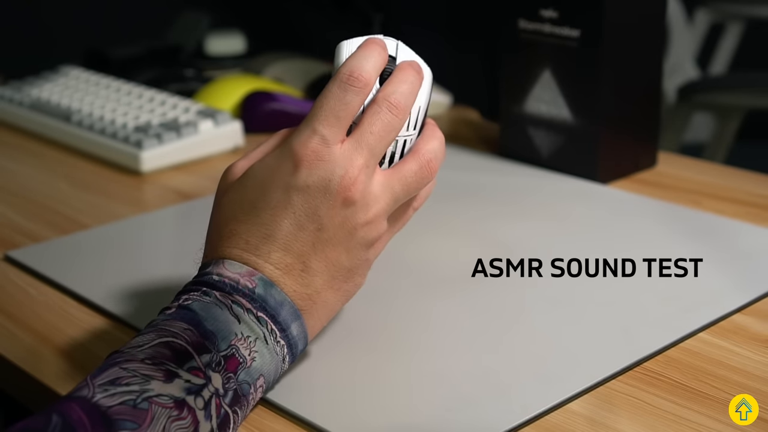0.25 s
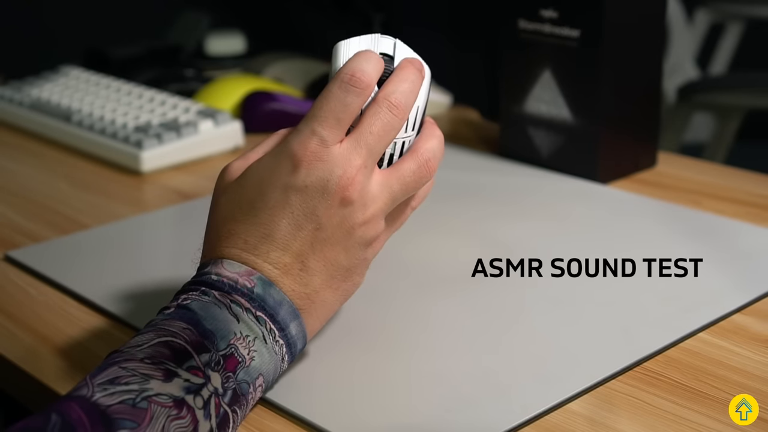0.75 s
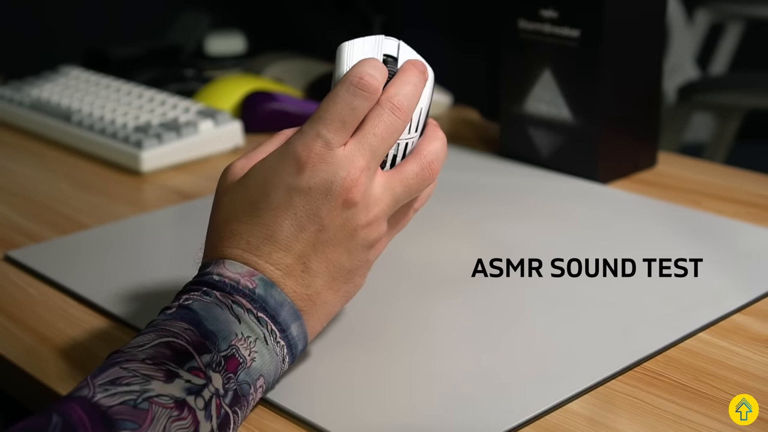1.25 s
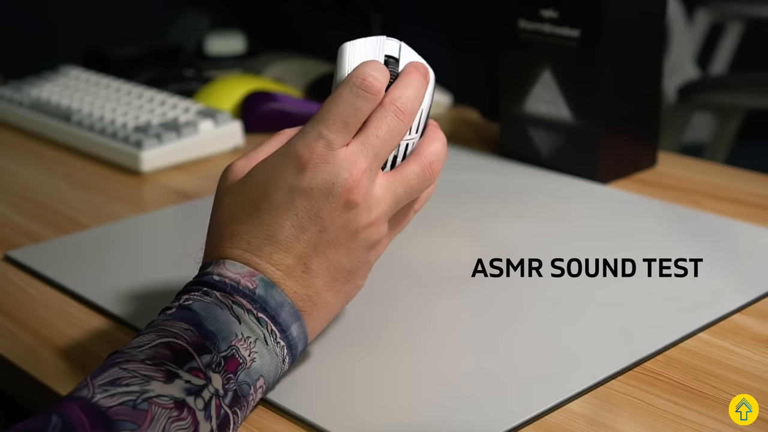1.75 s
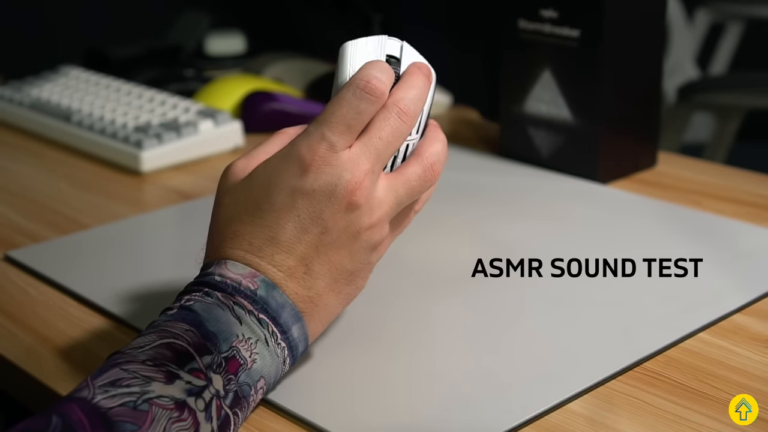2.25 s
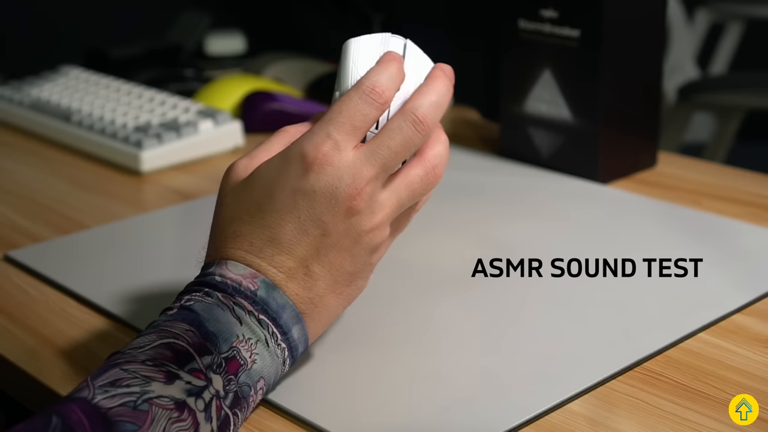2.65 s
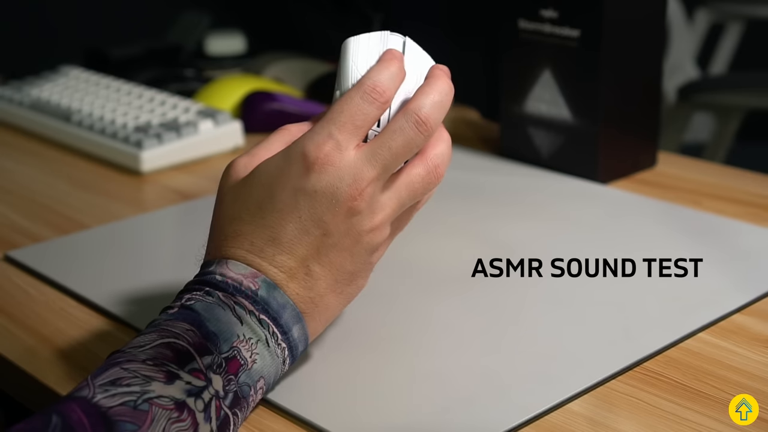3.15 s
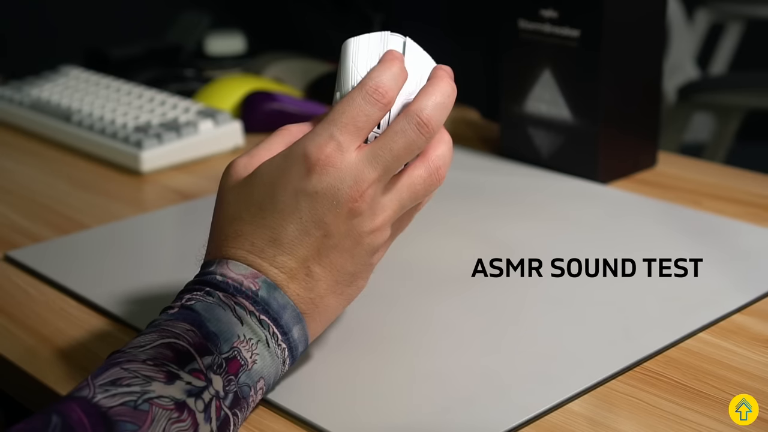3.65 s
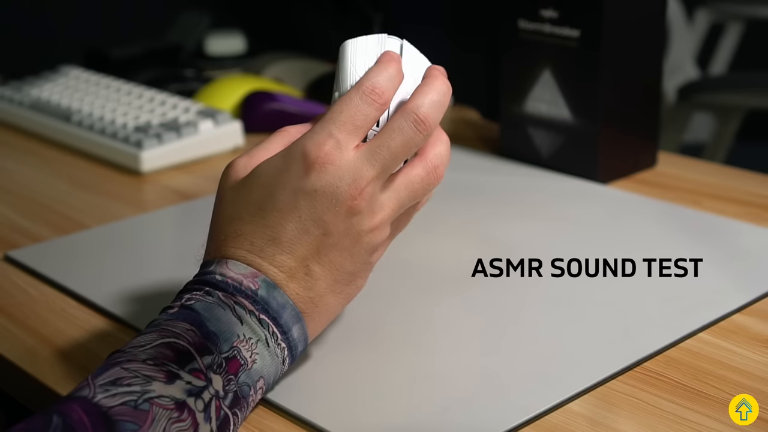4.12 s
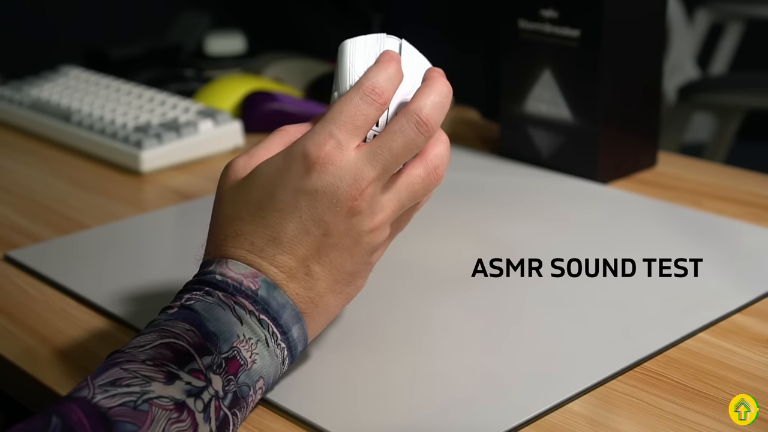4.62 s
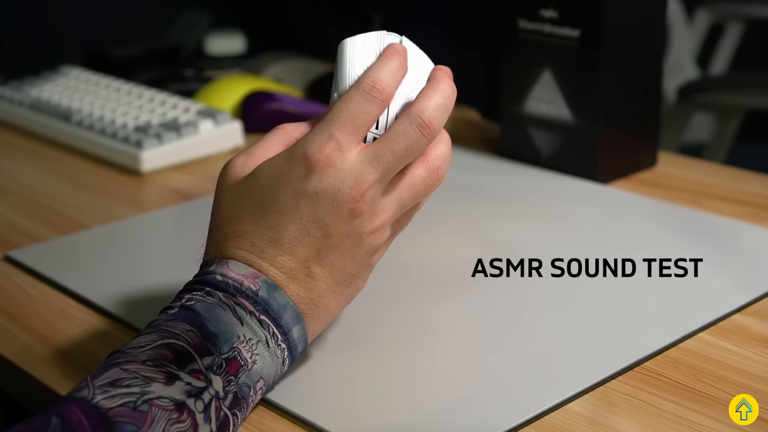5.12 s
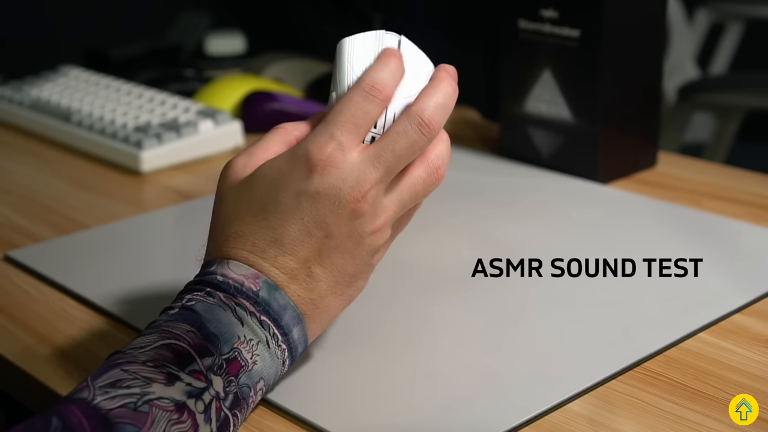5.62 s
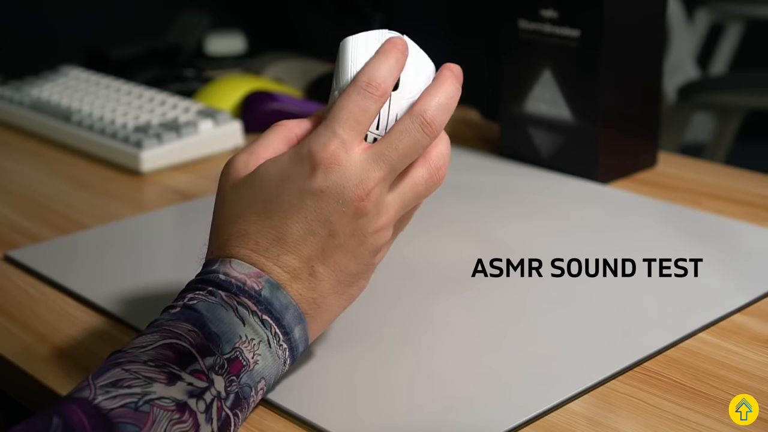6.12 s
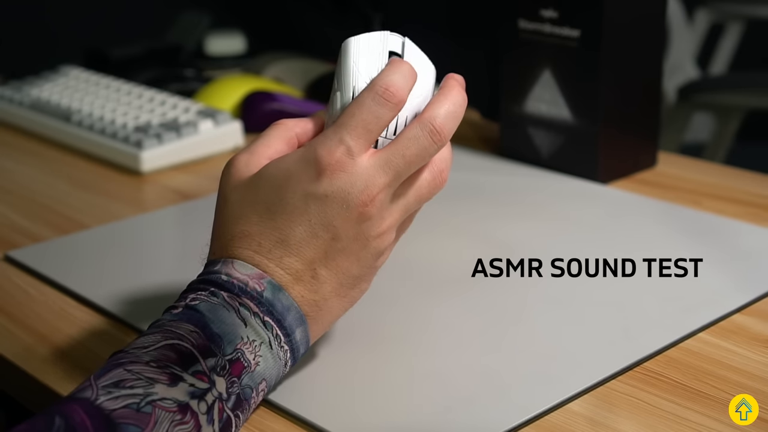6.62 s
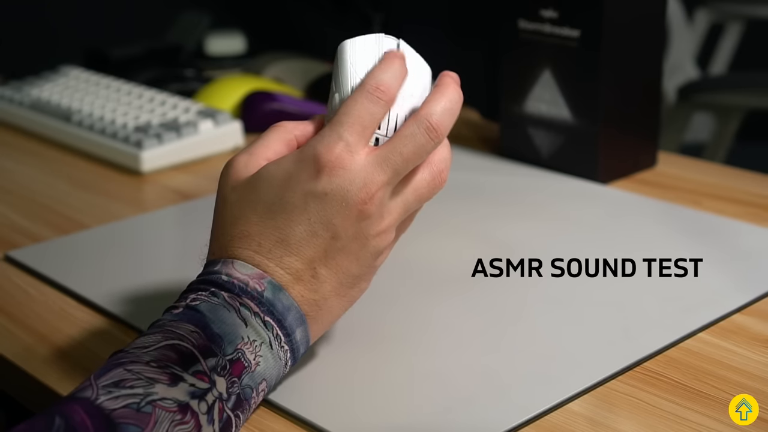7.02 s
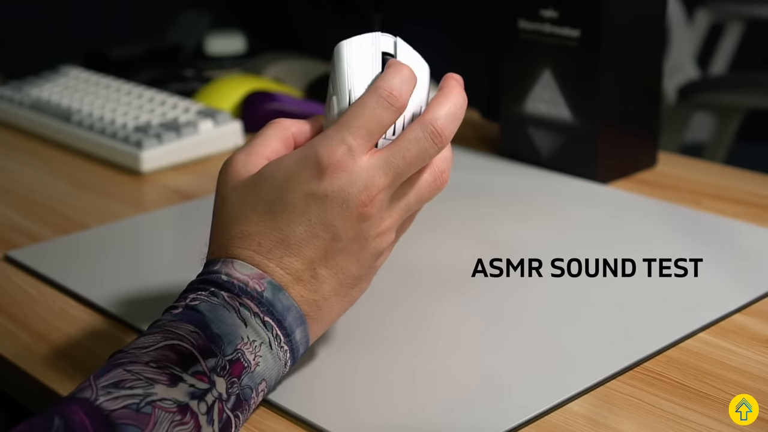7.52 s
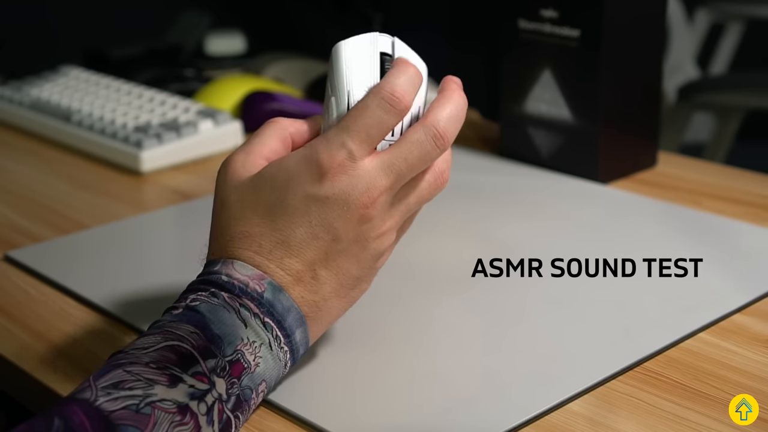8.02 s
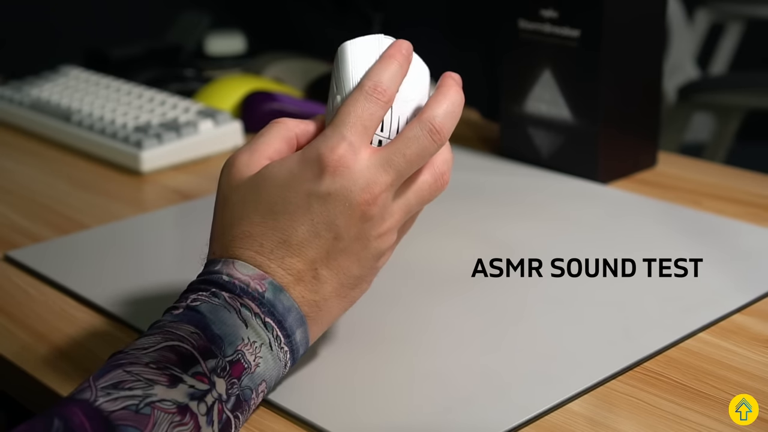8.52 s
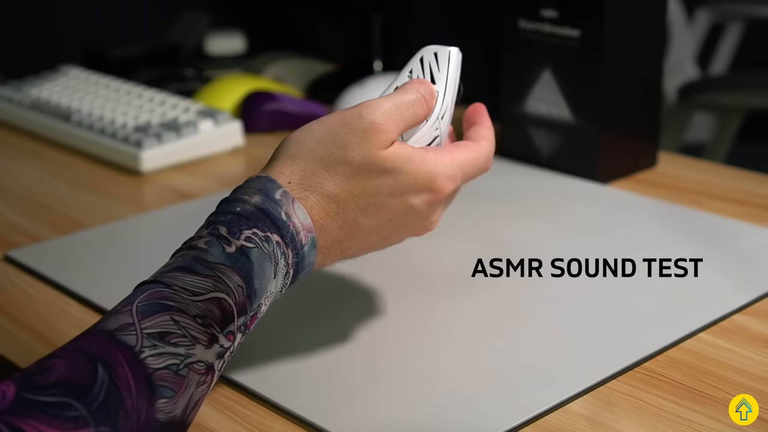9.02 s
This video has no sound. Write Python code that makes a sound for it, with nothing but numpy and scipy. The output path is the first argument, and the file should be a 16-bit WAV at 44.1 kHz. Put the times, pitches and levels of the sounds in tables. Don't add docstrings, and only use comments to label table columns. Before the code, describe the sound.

A plastic computer mouse very close to the microphone in a quiet small room. Two bright left clicks, then nine quick right clicks, each a press and lighter release. Seven much softer, duller side-button clicks follow. The scroll wheel is rolled in short strokes of four or five tiny ticks, first faint, then brighter the other way. Two sharp, loud small-switch clicks end it. Faint fan noise and low rumble lie underneath.

```python
import sys
import numpy as np
from scipy import signal
from scipy.fft import rfft, irfft
from scipy.io import wavfile
from scipy.ndimage import uniform_filter1d, map_coordinates

SR = 44100
rng = np.random.default_rng(int(sys.argv[2]) if len(sys.argv) > 2 else 0)


def invert_db(level):
    return 10 ** (np.asarray(level, dtype=float) / 20)


def bounce(signal):
    frames = np.transpose(np.atleast_2d(signal))
    limited = np.clip(frames, -1, 1)
    pcm = np.round(limited * 32767).astype(np.int16)
    wavfile.write(sys.argv[1], SR, pcm)


N = 408366

# (time [s], peak level [dB])
LEFT_PRESSES = [
    (0.0333, -20),
    (0.2904, -18.5),
]
LEFT_RELEASES = [
    (0.179, -26.5),
    (0.4263, -25),
]
# (time [s], peak level [dB])
RIGHT_PRESSES = [(0.5572, -17.5), (0.846, -19), (1.0665, -17), (1.3277, -18), (1.571, -18.5),
                 (1.7753, -19.5), (1.9852, -19), (2.2047, -19), (2.378, -19)]
RIGHT_RELEASES = [(0.7226, -26), (0.9557, -23.5), (1.195, -22.5), (1.4186, -24.5), (1.6397, -22.5),
                  (1.8681, -24.5), (2.0824, -23.5), (2.2705, -22)]
# (time [s], peak level [dB])
SIDE_PRESSES = [(2.6887, -31.5), (2.965, -32.5), (3.2183, -34), (3.4656, -33), (4.0325, -33),
                (4.2832, -32.5), (4.803, -33.5)]
SIDE_RELEASES = [(2.8372, -34.5), (3.1138, -34), (3.3564, -35.5), (3.773, -34.5), (4.1937, -35),
                 (4.666, -34.5), (4.9593, -34.5)]
# (time [s], peak level [dB])
TICK_TIMES = [(0.5347, -53), (2.5745, -59), (2.835, -53), (3.3448, -45), (3.5823, -52.5), (4.6632, -50),
              (4.7945, -62), (4.7564, -49.5), (6.6834, -65.5), (6.8244, -63)]
# (time [s], peak level [dB])
CREAK_TIMES = [
    (0.406, -50),
    (0.626, -56),
]
# (pitch [Hz], width [Hz], level [dB])
LOOSE_GRIP_RINGS = [(3550, 100, -5), (3860, 110, -7), (4500, 260, -9), (6570, 92, 11), (6900, 90, 5.5),
                    (8200, 170, -2), (10360, 330, 3), (11050, 300, 4), (11950, 120, 10), (12850, 160, -6),
                    (14400, 300, 5), (14850, 300, 3.5)]
LEFT_PRESS_RINGS = [(4860, 360, -3.5), (6670, 280, -5), (7490, 340, -13), (10300, 780, -6.5),
                    (11450, 330, 1), (12500, 120, -12), (14600, 150, -13), (14200, 280, 2)]
LEFT_RELEASE_RINGS = [(4680, 390, -9), (5500, 260, -2.5), (6830, 180, -6), (7450, 410, 0),
                      (8600, 920, -4.5), (9900, 240, -9), (10330, 500, -7), (12200, 450, -2),
                      (12730, 340, -3), (13400, 260, 1), (15300, 310, -4)]
RIGHT_PRESS_RINGS = [(4270, 370, -15.5), (4560, 186, -5), (5740, 330, -29.5), (6720, 180, -5),
                     (7470, 200, -7), (7800, 130, -20), (8940, 290, -9), (10643, 374, -0.5),
                     (11690, 590, -0.5), (13860, 110, -8), (14400, 770, -10.5), (15240, 870, -5)]
RIGHT_RELEASE_RINGS = [(3650, 160, -16), (4390, 130, -2.5), (5760, 370, -17.5), (7570, 480, 0),
                       (9070, 330, -8.5), (9890, 320, 2.5), (10550, 540, -6.5), (11890, 420, 0.5),
                       (12930, 203, -12.5), (13500, 190, -11.5), (13470, 117, -18), (14060, 180, -2.5),
                       (14920, 520, -6)]
SIDE_PRESS_RINGS = [(1514, 68, -17), (1838, 160, 3), (2772, 220, 4), (3550, 380, -5.5), (4820, 300, -8),
                    (5560, 160, -5.5), (6660, 820, -20), (9870, 240, -6), (10860, 450, -12),
                    (11900, 100, -20), (13400, 280, -33), (15460, 480, -16)]
SIDE_RELEASE_RINGS = [(1616, 70, -15), (1815, 150, 3.5), (2830, 220, 2), (3520, 200, -5), (4730, 530, -8.5),
                      (5680, 120, -3.5), (6280, 85, -31), (6780, 82, -24), (8240, 100, -29), (9210, 190, 0),
                      (10080, 320, -19.5), (11770, 170, -8.5), (12700, 180, -44), (14500, 210, -34)]
TICK_RINGS = [(4840, 1200, -10), (9000, 1800, 0), (11400, 1400, -2), (15850, 1000, -1.5)]
CREAK_RINGS = [(2540, 65, -2.5), (4750, 490, -25), (9150, 400, -30.5), (12200, 710, -31), (14700, 660, -36)]
# (pitch [Hz], width [Hz], level [dB])
COVER_PRESS_RINGS = [(755, 190, -22), (1775, 116, -18), (2720, 218, -18.5), (3456, 150, -21)]
COVER_RELEASE_RINGS = [(670, 170, -17), (1895, 220, -17.5), (2450, 110, -27)]
SIDE_WALL_RINGS = [(600, 63, -6), (780, 340, -18), (1366, 183, -9)]


def buttons():
    left = (clicks(LEFT_PRESSES[:1], LOOSE_GRIP_RINGS + COVER_PRESS_RINGS,
                   rise_ms=0.39, fall_ms=0.98, crack_db=-9.5)
            + clicks(LEFT_PRESSES[1:], LEFT_PRESS_RINGS + COVER_PRESS_RINGS,
                     rise_ms=0.34, fall_ms=0.47, crack_db=-24)
            + clicks(LEFT_RELEASES, LEFT_RELEASE_RINGS + COVER_RELEASE_RINGS,
                     rise_ms=0.55, fall_ms=1.0, crack_db=-9.5))
    right = (clicks(RIGHT_PRESSES, RIGHT_PRESS_RINGS + COVER_PRESS_RINGS,
                    rise_ms=0.36, fall_ms=1.0, crack_db=-18)
             + clicks(RIGHT_RELEASES, RIGHT_RELEASE_RINGS + COVER_RELEASE_RINGS,
                      rise_ms=0.52, fall_ms=0.79, crack_db=-11))
    side = (clicks(SIDE_PRESSES, SIDE_PRESS_RINGS + SIDE_WALL_RINGS,
                   rise_ms=0.25, fall_ms=0.74, crack_db=-19.5, fresh=0.22, spread=1.6)
            + clicks(SIDE_RELEASES, SIDE_RELEASE_RINGS + SIDE_WALL_RINGS,
                     rise_ms=0.38, fall_ms=1.4, crack_db=-12.5, fresh=0.21, spread=1.2))
    ticks = clicks(TICK_TIMES, TICK_RINGS, rise_ms=0.19, fall_ms=1.7, crack_db=21, fresh=0.71)
    creaks = clicks(CREAK_TIMES, CREAK_RINGS, rise_ms=1.4, fall_ms=1.1, crack_db=-40)
    return left + right + side + ticks + creaks


# (pitch [Hz], width [Hz])
BROAD_CRACK = (7000, 11000)


def clicks(events, body, rise_ms, fall_ms, crack_db, fresh=0.15, size=2048, spread=2.14):
    ms = np.arange(size) / SR * 1000
    shape = (1 - np.exp(-(ms / rise_ms) ** 2)) * np.exp(-(ms / (1.7 * fall_ms)) ** 1.6)
    habit = rng.standard_normal(size)
    luck = rng.standard_normal((len(events), size))
    drive = np.sqrt(max(1 - fresh, 0)) * chatter(habit, shape) + np.sqrt(fresh) * chatter(luck, shape)
    level_luck_db = 1.2 * rng.standard_normal((len(events), len(body) + 1))
    levels = invert_db(np.append(np.array(body)[:, 2], crack_db) + level_luck_db)
    sounds = []
    for blur in (1, spread):
        modes = [(-1) ** k * resonance(hz, 1.7 * width_hz * blur, size) ** 2
                 for k, (hz, width_hz, db) in enumerate(body)]
        modes = np.array(modes + [resonance(*BROAD_CRACK, size) * np.sqrt(blur)])
        power = np.abs(modes) ** 2
        share = np.sqrt(np.abs(drive) ** 2 @ power.T / np.sum(power, axis=1))
        sounds.append(irfft(drive * ((levels / share) @ modes), size) / np.sqrt(blur))
        drive = drive / np.abs(drive)
    out = np.zeros((2, N + size))
    for (s, peak_db), sound in zip(events, np.stack(sounds, axis=1)):
        start = round(s * SR)
        out[:, start:start + size] += invert_db(peak_db) * sound / np.abs(sound[0]).max()
    return out[:, :N]


def chatter(noise, shape, count=8):
    x = shape * noise
    for _ in range(count):
        spectrum = rfft(x)
        flat = irfft(spectrum / np.abs(spectrum), len(shape))
        x = np.abs(shape * noise) * np.sign(flat)
    return rfft(x)


def resonance(hz, width_hz, size):
    z = np.exp(-2j * np.pi * np.arange(size // 2 + 1) / size)
    r = np.exp(-np.pi * width_hz / SR)
    return (1 - r * r) / 2 * (1 - z * z) / (1 - 2 * r * np.cos(2 * np.pi * hz / SR) * z + r * r * z * z)


# (time [s], peak level [dB])
AXLE_LANDINGS = [(4.7094, -54), (5.2566, -58), (8.016, -56), (6.3834, -62), (6.9436, -51), (7.202, -63),
                 (7.4728, -49), (7.7405, -51), (8.2963, -56)]
# (pitch [Hz], width [Hz], level [dB])
PULL_RINGS = [(2830, 260, -2.5), (3660, 230, 8.5), (4520, 460, -6.5), (6130, 1800, 6.5), (7000, 150, -10),
              (8500, 4000, -5.5), (9300, 1200, -2.5), (11400, 470, 6), (12900, 270, -21), (13800, 940, -32)]
PUSH_RINGS = [(3300, 250, -6), (3950, 130, -2.5), (4800, 610, -8.5), (5940, 260, 3.5), (6800, 230, 2.5),
              (7920, 640, -0.5), (9000, 130, 1.5), (9450, 220, 0), (10160, 1000, -4.5), (12200, 730, 3),
              (13700, 800, -18), (14900, 700, -7.5)]
# (pitch [Hz], width [Hz], level [dB])
SHELL_RINGS = [(618, 116, 7.5), (1185, 110, -16.5), (1595, 260, 6.5), (1835, 60, 0), (2750, 95, 1.5)]
RUB_RINGS = [(593, 31, 10), (1180, 200, 0.5), (1930, 110, 4), (4530, 5100, -9), (6900, 430, -1),
             (9900, 4800, -21)]


def wheel():
    s, snap_db, knock_db = notches()
    pulled = s < 6.9
    snap_events = np.c_[s, snap_db + 8]
    snaps = (clicks(snap_events[pulled], PULL_RINGS, rise_ms=0.97, fall_ms=1.7, crack_db=1.5, fresh=1.0)
             + clicks(snap_events[~pulled], PUSH_RINGS, rise_ms=1.0, fall_ms=1.5, crack_db=-20.0, fresh=0.98))
    knocks = clicks(np.c_[s, knock_db + 4], SHELL_RINGS, rise_ms=0.39, fall_ms=1.2, crack_db=-13, fresh=0.97)
    landings = clicks(AXLE_LANDINGS, SHELL_RINGS + PULL_RINGS[:3],
                      rise_ms=0.77, fall_ms=1.3, crack_db=-12, fresh=0.44)
    turning = np.sqrt(np.maximum(uniform_filter1d(knocks[0] ** 2, round(0.024 * SR)), 0))
    shell = sum((-1) ** k * invert_db(db) * resonance(hz, width_hz, N)
                for k, (hz, width_hz, db) in enumerate(RUB_RINGS))
    rub = invert_db(-0.5) * turning * coloured(shell)
    return snaps + favoured_rings() + knocks + landings + rub


# (time [s], spring snap level [dB], shell knock level [dB], pitch the spring favours [Hz])
PULLED_NOTCHES = [(5.2759, -56, -65, 4000), (5.2885, -51, -68, 7060), (5.3054, -54, -68, 6550),
                  (5.5678, -65, -63, 2840), (5.581, -49.5, -60, 6440), (5.5912, -49, -62, 6570),
                  (5.601, -51, -59, 5560), (5.6129, -49, -62.5, 6810), (5.8696, -51, -61.5, 6840),
                  (5.883, -59, -57, 3240), (5.895, -55, -62, 2680), (5.907, -48, -61, 6200),
                  (6.1523, -51, -63, 3990), (6.1642, -44.5, -65, 5600), (6.173, -43, -64, 5900),
                  (6.182, -49, -64, 5650), (6.1922, -54, -58.5, 4580), (6.4537, -47, -62, 8910),
                  (6.4614, -49, -59, 5800), (6.468, -50, -57, 2590), (6.4774, -55, -63, 6460),
                  (6.7426, -53, -63, 6990), (6.7556, -53, -67, 5610), (6.767, -56, -59, 2470),
                  (6.7795, -48, -62, 5900)]
PUSHED_NOTCHES = [(6.9581, -38, -63, 9380), (6.967, -37, -66, 9380), (6.975, -38, -58, 6990),
                  (6.9833, -39, -61, 10000), (6.994, -41.5, -61, 9100), (7.241, -41.5, -63, 9450),
                  (7.2533, -40, -63, 5940), (7.2644, -40.5, -66, 6800), (7.276, -41, -61, 6700),
                  (7.5175, -42, -62, 10000), (7.5297, -41.5, -64, 6800), (7.5406, -41, -62, 9400),
                  (7.5535, -43, -63.5, 5610), (7.7832, -40, -65, 6900), (7.7945, -41.5, -57.5, 6600),
                  (7.8055, -40, -62, 8800), (7.8168, -41, -61, 9100), (8.0528, -46, -61, 5830),
                  (8.0668, -47, -67, 9300), (8.079, -41, -66, 9700), (8.0924, -43, -61, 8940),
                  (8.337, -41, -63, 6030), (8.3509, -41, -64, 5900), (8.3623, -41, -66, 6000),
                  (8.3752, -46, -64, 6800)]
# (time [s], spring snap level [dB], shell knock level [dB])
NUDGED_NOTCHES = [(5.1943, -55, -61.5), (5.2571, -56, -62), (5.825, -68, -69), (5.851, -58.5, -59),
                  (6.3926, -61, -66), (6.404, -70, -76), (6.4274, -65, -65), (6.44, -67, -56.5),
                  (6.726, -67, -58.5), (6.948, -49, -59), (7.208, -54.5, -63), (7.4779, -47.5, -58),
                  (7.505, -66, -66), (7.7463, -53, -59.5), (8.021, -54, -62), (8.3013, -54, -57)]
COASTED_NOTCHES = [(5.3365, -64, -59.5), (5.6381, -58.5, -61), (6.5203, -83, -63), (7.009, -52, -63),
                   (7.044, -53, -59.5), (7.293, -53, -60.5), (7.3246, -62.5, -64), (7.576, -54.5, -59.5),
                   (7.834, -52.5, -59), (8.116, -55.5, -59.5), (8.392, -55, -62), (8.515, -70, -71)]


def notches():
    rows = [(s, snap_db - 8.5, knock_db + 4) for s, snap_db, knock_db, hz in PULLED_NOTCHES + PUSHED_NOTCHES]
    return np.transpose(rows + NUDGED_NOTCHES + COASTED_NOTCHES)


# (time [s], peak level [dB], pitch [Hz])
FIRST_NUDGE_RINGS = [(5.1723, -66, 9000), (5.1952, -56, 8930), (5.2571, -57, 2830), (5.8178, -68, 3080),
                     (6.3935, -62, 6820), (6.7801, -56, 2600), (7.2025, -57, 1930), (7.4785, -52, 3550),
                     (7.741, -51.5, 2020), (8.0218, -61, 2520), (8.3026, -69, 6700)]


def favoured_rings():
    rings = [(s, snap_db - 11, hz) for s, snap_db, knock_db, hz in PULLED_NOTCHES + PUSHED_NOTCHES]
    return sum(clicks([(s, db)], [(hz, 190, 0)], rise_ms=0.24, fall_ms=1.1, crack_db=-31)
               for s, db, hz in rings + FIRST_NUDGE_RINGS)


# (time [s], peak level [dB])
SMALL_PRESSES = [
    (8.9134, -12.5),
    (9.1419, -14),
]
SMALL_RELEASES = [
    (9.03, -16),
    (9.2504, -14),
]
# (pitch [Hz], width [Hz], level [dB])
SMALL_PRESS_RINGS = [(4300, 570, -19.5), (6200, 360, -5.5), (7350, 350, -26), (8400, 330, -19),
                     (9850, 540, -6.5), (11640, 530, -5), (13200, 170, -23), (13900, 290, -11),
                     (15170, 1300, -2.5), (16370, 590, -7)]
SMALL_RELEASE_RINGS = [(4020, 240, -9), (4450, 240, -6.5), (6130, 220, 1.5), (7560, 270, -10.5),
                       (8430, 380, -15), (10200, 380, -6), (11020, 220, 0.5), (12000, 440, -3),
                       (12200, 120, -24), (12400, 190, -13), (13700, 510, -20), (14770, 490, 1.5),
                       (16570, 1200, -7)]
BASE_RINGS = [(755, 250, -26.5), (1230, 210, -17), (1880, 240, -24), (2640, 600, -28)]


def small_switch():
    return (clicks(SMALL_PRESSES, SMALL_PRESS_RINGS + BASE_RINGS, rise_ms=0.45, fall_ms=0.44, crack_db=-43.0)
            + clicks(SMALL_RELEASES, SMALL_RELEASE_RINGS + BASE_RINGS, rise_ms=0.61, fall_ms=0.8, crack_db=-25.0))


STROKE_TIMES = [5.2763, 5.5674, 5.87, 6.1533, 6.453, 6.744, 6.9581, 7.241, 7.5166, 7.7834, 8.056, 8.338]


def thumps():
    lag_s, hz, width_hz, peak_db = 0.0399, 75.4, 12.2, -53.5
    pushes = np.zeros(N)
    pushes[np.round((np.array(STROKE_TIMES) + lag_s) * SR).astype(int)] = 1
    low = irfft(rfft(pushes) * resonance(hz, width_hz, N) ** 2, N)
    return invert_db(peak_db) * low / np.abs(low).max()


# (pitch [Hz], time to fall by 60 dB [s], level [dB])
ROOM_DECAY = [(495, 0.242, 0.5), (1458, 0.25, -3.5), (4020, 0.21, 1), (10000, 0.089, 3.5), (13000, 0.2, -1),
              (16000, 0.15, -12)]


def room(x, near_db, near_t60, far_db):
    t = np.arange(SR // 2) / SR
    walls = 0
    for low_hz in 300 * 2 ** np.arange(6.):
        octave = signal.butter(2, [low_hz, 2 * low_hz], "band", fs=SR, output="sos")
        echoes = signal.sosfilt(octave, np.sign(rng.standard_normal(len(t))))
        middle_hz = 1.4 * low_hz
        fall_db = 60 * t / at_hz(ROOM_DECAY, middle_hz)
        walls = walls + echoes * invert_db(at_hz(ROOM_DECAY, middle_hz, axis=2) - fall_db)
    walls *= invert_db(far_db) * np.clip((t - 0.003) / 0.013, 0, 1)
    near = invert_db(near_db - 60 * t / near_t60) * np.sign(rng.standard_normal(len(t))) * (t > 0.0015)
    return signal.fftconvolve(x, (walls + near)[None], axes=1)[:, :N]


def at_hz(points, hz, axis=1):
    return np.interp(np.log(hz + 1), np.log(np.array(points)[:, 0]), np.array(points)[:, axis])


# (pitch [Hz], level per Hz [dB])
FAN_COLOUR = [(88, -57.5), (150, -18), (209, -2), (300, -10.5), (621, -14), (1180, -24), (2520, -31),
              (15700, -36.5)]
# (pitch [Hz], width [Hz], rms level [dB])
ROOM_BOOMS = [(30.45, 2.1, -62.5), (58.4, 3.9, -64.5), (117.1, 17, -76.5), (136.24, 8, -69.5),
              (152, 21, -78), (199.9, 11, -79.5), (242.5, 11, -84.5), (305, 25, -78.5), (609.6, 74, -84.5)]
# (pitch [Hz], rms level [dB])
HUM_TONES = [(119.6, -67), (385.9, -74.5), (771.6, -82.5)]


def background():
    hz, t = np.arange(N // 2 + 1) * SR / N, np.arange(N) / SR
    out = invert_db(-66.5) * coloured(invert_db(at_hz(FAN_COLOUR, hz)) * (hz > 80))
    for centre_hz, width_hz, db in ROOM_BOOMS:
        out += invert_db(db) * coloured(resonance(centre_hz, width_hz, N) ** 2)
    for tone_hz, db in HUM_TONES:
        out += invert_db(db) * np.sqrt(2) * np.sin(2 * np.pi * tone_hz * t)
    return out + rumble()


# (time [s], strength [dB], upper rumble against the deep one [dB])
SHAKING = [(0.0, -54.5, -3), (0.29, -48.5, -2.5), (0.39, -57.5, -1), (0.61, -52.5, -3.5),
           (0.66, -67.5, 12.5), (1.79, -54, -12), (3.09, -56.5, -11), (3.38, -44, 5), (3.6, -57, -12),
           (5.05, -55, 1), (5.22, -43, -11), (5.81, -52.5, -5.5), (8.38, -50, -4.5), (8.48, -58, 6),
           (8.53, -58, -9), (8.8, -49, -29)]


def rumble():
    wobble_db, wobble_per_s, drop_s = 1.2, 3.2, 8.83
    before_change = np.arange(N) / SR < drop_s
    strength_db, stiffness_db = in_time(SHAKING)
    deep_db = strength_db + wobble_db * drift(wobble_per_s)
    upper_db = strength_db + stiffness_db - 3.5 + wobble_db * drift(wobble_per_s)
    deep = invert_db(np.where(before_change, deep_db, -80.5)) * coloured(resonance(29.45, 15.6, N) ** 2)
    upper = invert_db(np.where(before_change, upper_db, -67)) * coloured(resonance(58.1, 27, N) ** 4)
    return deep + upper


def in_time(rows):
    s, *columns = np.transpose(rows)
    return [np.interp(np.arange(N) / SR, s, column) for column in columns]


def drift(rate):
    knots = rng.standard_normal(200)
    return map_coordinates(knots, [np.arange(N) / SR * 2 * rate], order=3)


def coloured(gain):
    noise = irfft(rfft(rng.standard_normal(N)) * gain, N)
    return noise / np.sqrt(np.mean(noise ** 2) + 1e-20)


# (time its click would sound [s], fade-
# in start [s], peak level [dB])
ECHO_ONLY_CLICK = (8.79, 8.826, -16)


def scene():
    mouse, all_round = buttons() + small_switch() + wheel()
    click_s, fade_s, peak_db = ECHO_ONLY_CLICK
    unheard = clicks([(click_s, peak_db)], SMALL_RELEASE_RINGS, rise_ms=0.7, fall_ms=0.8, crack_db=-18)[1]
    echo, late_echo = room(np.array([all_round, unheard]), near_db=-31, near_t60=0.061, far_db=-40.5)
    fade = np.clip((np.arange(N) / SR - fade_s) / 0.025, 0, 1)
    return (mouse + echo + fade * late_echo + thumps() + background())[None]


def quiet_top_removed(x):
    from_hz, edge_hz, gate_db = 15750, 400, -59
    hz = np.arange(N // 2 + 1) * SR / N
    top = irfft(rfft(x) * np.clip((hz - from_hz) / edge_hz, 0, 1), N)
    loud = uniform_filter1d(top ** 2, 200) > invert_db(2 * gate_db)
    return x - top * (1 - uniform_filter1d(1. * loud, 100))


# (middle time [s], length [ms], share lost [0-1])
HISS_GAPS = [(.714, 11, 1), (.9485, 7, .9), (2.748, 16, .75), (3.644, 18, .95), (3.849, 28, 1),
             (4.733, 14, .7), (5.051, 16, .9), (6.601, 32, 1), (6.716, 12, .75), (6.866, 14, .85),
             (7.142, 20, .7), (7.379, 20, .9), (8.668, 38, 1), (9.21, 20, 1)]


def hiss_dropped(x):
    from_hz, spared_share, band_hz = 1600, 0.2, 200
    out, size = x.copy(), 4096
    hz = np.arange(size // 2 + 1) * SR / size
    all_spared = rng.random((len(HISS_GAPS), 128)) < spared_share
    for (s, ms, share), spared in zip(HISS_GAPS, all_spared):
        middle = round(s * SR)
        piece = slice(middle - size // 2, middle + size // 2)
        lost = min(share, 1) * (hz > from_hz) * ~spared[(hz / band_hz).astype(int)]
        distance = np.abs(np.arange(size) - size // 2) / (ms * SR / 1000)
        fade = np.clip(1.5 - 2 * distance, 0, 1)[:N - piece.start]
        out[:, piece] -= irfft(rfft(fade * x[:, piece], size) * lost, size)[:, :len(fade)]
    return out


def band_limit(x):
    return signal.sosfilt(signal.butter(12, 17170, fs=SR, output="sos"), x)


def record(dry):
    thinned = hiss_dropped(quiet_top_removed(dry))
    soft = signal.sosfilt(signal.butter(4, 16700, fs=SR, output="sos"), thinned)
    mix = signal.sosfilt(signal.cheby2(8, 50, 17300, fs=SR, output="sos"), soft)
    return band_limit(mix)


dry = scene()
out = record(dry)
bounce(out)
```